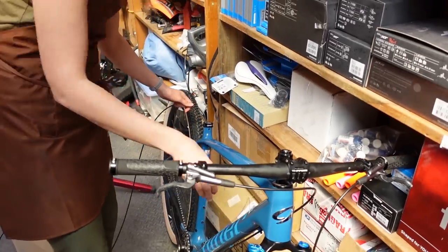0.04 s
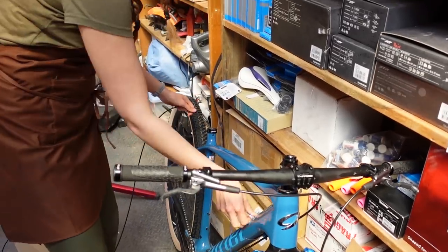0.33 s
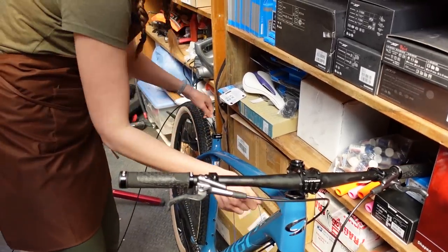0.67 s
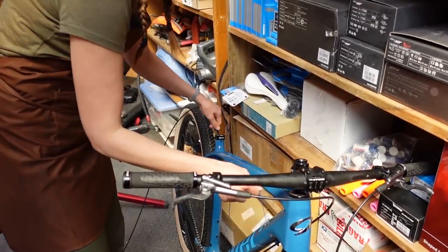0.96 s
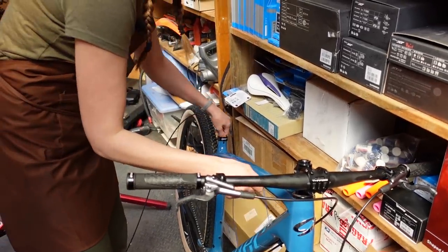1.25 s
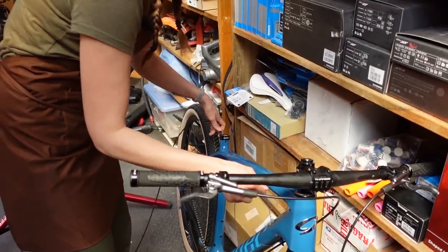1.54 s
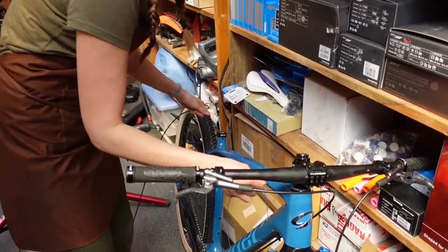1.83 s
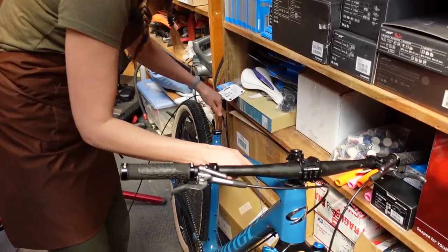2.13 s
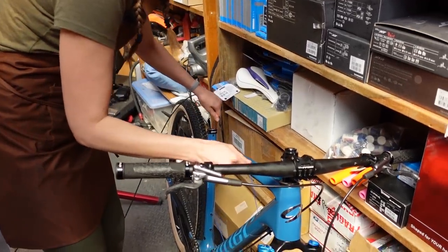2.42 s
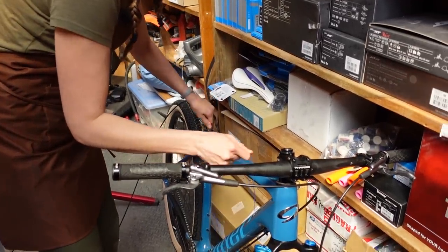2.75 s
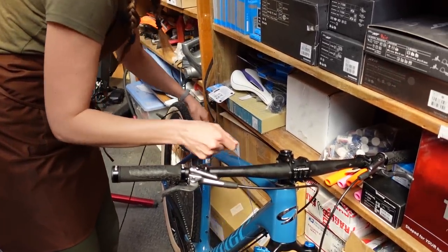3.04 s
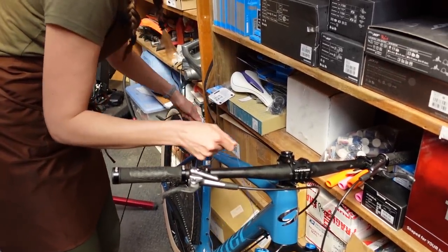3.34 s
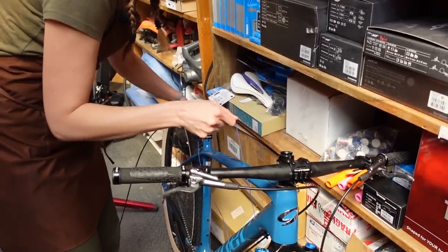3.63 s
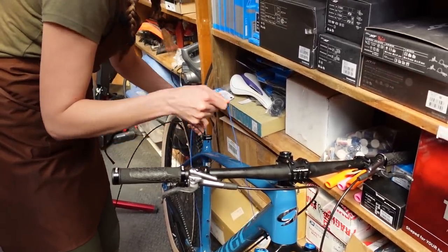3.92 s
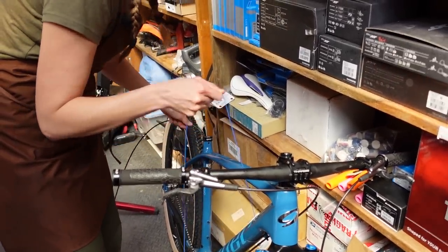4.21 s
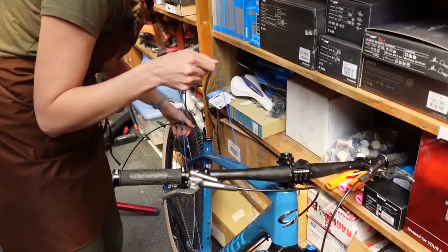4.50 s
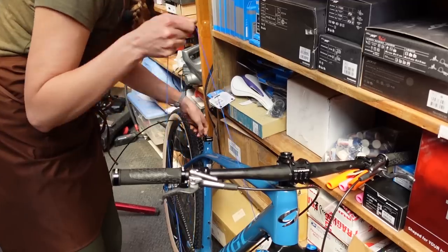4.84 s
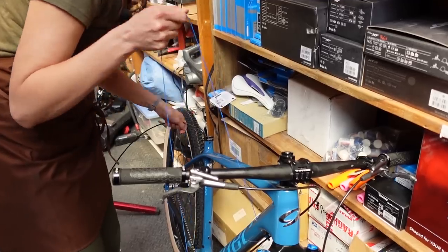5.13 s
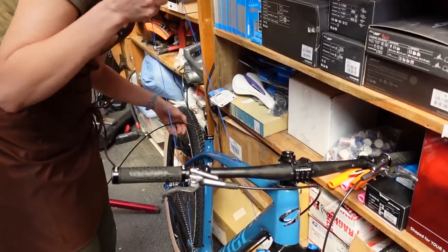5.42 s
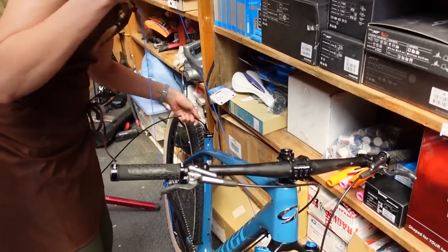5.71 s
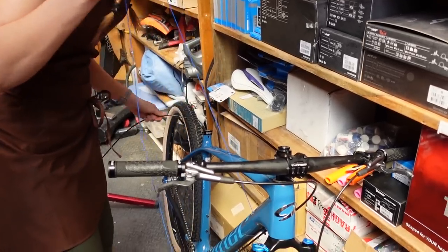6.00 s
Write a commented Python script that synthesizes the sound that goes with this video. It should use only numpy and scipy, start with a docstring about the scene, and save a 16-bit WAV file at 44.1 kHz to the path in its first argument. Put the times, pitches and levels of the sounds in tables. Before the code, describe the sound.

A cable housing is threaded through a bicycle frame, heard close up in a small, crowded workshop with little echo. In the first quarter second its loose end clatters against the hollow tubes in a quick cluster of clicks and slaps, each ringing briefly. Lighter taps and soft scrapes continue, with one sharp click at about 0.9 seconds. From 1.2 to 2.7 seconds it is quieter, with scattered ticks and the grainy rustle of hands and cloth. A few taps and a brief scrape come near 2.9 seconds. Then the housing is drawn through in short, raspy strokes at about 3.5, 3.9, 4.3, 4.7, 5.2 and 5.7 seconds, a couple carrying a faint squeak. Soft thumps fall among these pulls as the hands grip again and bump the frame. The strokes stay softer than the opening knocks, and a quiet room hum runs throughout.

```python
"""Threading brake housing through a bicycle frame

Close up in a small, crowded workshop, on a pair of microphones. The housing's loose end slaps and
clicks against the ringing tubes; then it is drawn through the port in short scraping strokes, with
soft thumps as the hands take a new grip. Sleeves rustle over a quiet room hum."""
import sys
import numpy as np
from scipy import signal
from scipy.fft import rfft, irfft, next_fast_len
from scipy.io import wavfile
from scipy.ndimage import uniform_filter1d, map_coordinates

SR = 44100
rng = np.random.default_rng(int(sys.argv[2]) if len(sys.argv) > 2 else 0)


def int16_out(signal):
    """Quantize to a 16-bit WAV file."""
    q = np.round(np.clip(np.atleast_2d(signal).T, -1, 1) * 32767)
    wavfile.write(sys.argv[1], SR, q.astype(np.int16))


N = 267235


def amp(db):
    """Decibels to gain."""
    return 10 ** (np.asarray(db) / 20)


def unit(x):
    """Scale to rms 1."""
    return x / np.sqrt(np.mean(x ** 2) + 1e-20)


def along(points, hz):
    """Read (frequency [Hz], value) points on a log frequency axis."""
    freqs, values = np.transpose(points)
    return np.interp(np.log(hz + 1), np.log(freqs + 1), values)


def wobble(rate):
    """A smooth random curve, rate knots a second."""
    knots = rng.standard_normal(int(N * rate / SR) + 4)
    return map_coordinates(knots, [np.arange(N) * rate / SR])


def filtered(x, response):
    """Pass x through a complex response of frequency."""
    size = next_fast_len(N + SR // 2)
    return irfft(rfft(x, size) * response(np.fft.rfftfreq(size, 1 / SR)), size)[..., :N]


def coloured(x, colour):
    """Give x a (frequency [Hz], level [dB]) colour, at rms 1."""
    return unit(filtered(x, lambda hz: amp(along(colour, hz))))


def resonance(hz, centre_hz, width_hz):
    """One damped mode, gain 1 at its centre."""
    return 1j * hz * width_hz / (centre_hz ** 2 - hz ** 2 + 1j * hz * width_hz)


def tight_pulse(colour_db, size=4096):
    """The minimum-phase pulse whose level follows this function of frequency."""
    cepstrum = irfft(np.log(amp(colour_db(np.fft.rfftfreq(size, 1 / SR)))))
    cepstrum[1:size // 2] *= 2
    cepstrum[size // 2 + 1:] = 0
    return irfft(np.exp(rfft(cepstrum)))


def burst(t60, size=8192):
    """Dying noise of energy 1, even in colour over wide bands."""
    decay = amp(-60 * np.arange(size) / SR / max(t60, 0.002))
    spectrum = rfft(rng.standard_normal(size) * decay)
    band_power = np.abs(uniform_filter1d(np.abs(spectrum) ** 2, size=70))
    even = irfft(spectrum / np.sqrt(band_power + 1e-12))[:size // 2]
    return even / np.linalg.norm(even)


def microphones(mid, scattered, side_colour):
    """Two close microphones agree in the middle range; scattered sound parts them in the treble."""
    side = filtered(scattered, lambda hz: amp(along(side_colour, hz)))
    return np.array([mid + side, mid - side])


def room_tone(air_db, waver_rad):
    """Soft moving air and a slightly unsteady hum, all round the microphones."""
    # colour of the air: (frequency [Hz], level [dB])
    air_colour = [(12, -40), (20, -0.5), (60, -6.5), (113, -7), (172, -3.5), (262, -6), (357, 2),
                  (446, -4.5), (738, -1), (873, -5.5), (1090, -2), (1960, -11.5), (4940, -13), (14700, -19),
                  (16000, -24.5)]
    # its stereo width: (frequency [Hz], side over mid [dB])
    air_side = [(60, -4), (150, -5.5), (380, -6.5), (950, -10), (2380, -3.5), (5980, -2.5), (15000, 1)]
    # tones of the hum: (frequency [Hz], level [dB])
    hum_tones = [(59, -77), (172.3, -79.5), (387.6, -105)]
    t = np.arange(N) / SR
    hum = sum(np.sqrt(2) * amp(db) * np.sin(2 * np.pi * hz * t + waver_rad * wobble(2.94))
              for hz, db in hum_tones)
    air, scattered = amp(air_db) * coloured(rng.standard_normal((2, N)), air_colour)
    return microphones(air, scattered, air_side) + hum


def movement(start, length, db, crest=0.37):
    """Gain of one hand movement: a quick start, a swell to its fastest moment, a stop."""
    attack_s, release_s = 0.027, 0.043
    edge_db, rest_db = -6.5, -23.5
    fastest = start + np.clip(crest, 0.02, 0.98) * length
    end = start + length
    times = [start - attack_s, start, fastest, end, end + release_s]
    t = np.arange(N) / SR
    moving = (t > times[0]) & (t < times[-1])
    return moving * amp(db + np.interp(t, times, [rest_db, edge_db, 0, edge_db, rest_db]))


def sleeve_rubs(grain_db):
    """Hands and cloth slide along the housing and frame with a grainy rustle."""
    # hand movements: (start [s], length [s], level [dB])
    rubs = [(0, 0.043, -50.5), (0.294, 0.58, -54.5), (0.986, 0.32, -58.5), (1.504, 0.28, -61),
            (1.855, 0.27, -54), (2.148, 0.45, -47.5), (2.804, .2, -61.5), (3.17, 0.11, -57),
            (3.389, 0.36, -52.5), (3.888, .16, -50), (4.248, 0.26, -54), (4.702, 0.034, -58),
            (4.94, 0.02, -46), (5.15, 0.37, -60.5), (5.6, 0.6, -59)]
    # colour of the rustle: (frequency [Hz], level [dB])
    rub_colour = [(70, -12), (160, -13), (250, -4.5), (350, 1.5), (650, 2.5), (1200, 0.5), (2000, -7.5),
                  (5000, -8.5), (14000, -23.5)]
    friction = rng.standard_normal(N) * amp(grain_db * wobble(120))
    return coloured(friction, rub_colour) * sum(movement(*rub) for rub in rubs)


def shifting_resonances(x, depth_db):
    """The free length of housing keeps changing, so its resonances come and go."""
    spectra = signal.stft(x, nperseg=1024)[2]
    patches = uniform_filter1d(rng.standard_normal(spectra.shape), size=4, axis=0)
    patches = unit(uniform_filter1d(patches, size=5, axis=1))
    return signal.istft(spectra * amp(depth_db * patches), nperseg=1024)[1][:N]


def port_scrapes(grain_db, judder_db):
    """The housing's sheath catches and slips on the port's edge with each pull."""
    # pulls through the port: (start [s], length [s], level [dB],
    # fastest moment [share of length], treble lift [dB], rasp lift [dB])
    pulls = [(.01, 0.19, -50.5, 0.8, -5, 6), (0.136, 0.32, -47, 0.4, 4, 1), (0.54, 0.26, -48, .6, 6, 6),
             (0.873, 0.29, -52.5, 0.12, 13.5, 7.5), (1.199, 0.15, -53.5, 1, 0, 0),
             (1.485, 0.09, -58, 0.54, 3.5, -3), (1.832, 0.017, -57, .4, 3, -2),
             (1.911, 0.21, -54, 0.55, 7, -2), (2.258, 0.079, -50, 0.24, 2.5, -14),
             (2.433, 0.11, -46, 0.57, -0.5, 0), (2.783, .04, -50, .5, 13.5, -12),
             (2.905, 0.079, -38, 0.87, 4.5, -7), (3.465, 0.12, -39.5, 0.51, 11.5, 1),
             (3.615, 0.084, -56.5, 0.27, 9, -1), (3.88, .16, -40.5, .45, 0.5, 1),
             (4.276, 0.16, -38.5, 0.38, 3, 1.5), (4.728, 0.17, -39, 0.38, 1.5, 4),
             (5.188, .15, -37.5, 0.48, 3, 3), (5.655, 0.13, -43.5, 0.36, 5, 2),
             (5.835, 0.07, -51.5, 0.23, 3, -3)]
    # colour of the scrape: (frequency [Hz], level [dB])
    scrape_colour = [(240, -45), (400, -38), (742, -10.5), (893, -13.5), (1180, 4), (1290, -6), (1710, 2),
                     (1790, -5), (2120, -1.5), (3930, -3), (5600, -5.5), (6050, -5), (11800, -20),
                     (16000, -33.5)]
    # the port's rasping resonance: (centre [Hz], width [Hz])
    rasp_mode = (3830, 720)
    slips = rng.standard_normal(N) * amp(grain_db * wobble(930) + judder_db * wobble(70))
    scrape = coloured(shifting_resonances(slips, depth_db=3.0), scrape_colour)
    hiss = filtered(scrape, lambda hz: hz ** 2 / (hz ** 2 + 5500 ** 2))
    rasp = filtered(scrape, lambda hz: resonance(hz, *rasp_mode))
    out = np.zeros(N)
    for start, length, db, crest, treble_db, rasp_db in pulls:
        stroke = scrape + hiss * (amp(treble_db) - 1) + rasp * (amp(rasp_db) - 1)
        out += movement(start, length, db, crest) * stroke
    return out


def contacts(strikes, colour, snap_db, pitch_spread, chatter_s, rise_s):
    """Each contact is a snap and a brief chatter; the spot that is struck favours its own pitch."""
    out = np.zeros(N + SR)
    for start, db, tilt_db, t60, pitch_hz, emphasis_db in strikes:
        favoured = lambda hz: emphasis_db * np.exp(-(np.log((hz + 1) / pitch_hz) / pitch_spread) ** 2)
        hardness = lambda hz: tilt_db * np.log2(np.hypot(hz, 300) / pitch_hz)
        pulse = tight_pulse(lambda hz: along(colour, hz) + hardness(hz) + favoured(hz))
        # short contacts are nearly all snap; long ones are scuffs that build up more slowly
        softness = min(t60 / chatter_s, 3) ** 2
        force = burst(t60)
        force *= 1 - np.exp(-np.arange(len(force)) / SR / (rise_s * softness))
        force[0] += amp(snap_db) / softness
        hit = signal.fftconvolve(force, pulse)
        hit *= np.sqrt(SR / 100) / np.linalg.norm(hit)  # the energy of 10 ms at rms 1
        out[round(start * SR):][:len(hit)] += amp(db) * hit
    return out[:N]


def end_clicks():
    """The hard end of the housing clicks on the frame."""
    # clicks: (time [s], level [dB], tilt [dB/octave], chatter t60 [s], pitch [Hz], emphasis [dB])
    strikes = [(0.109, -21, 11, 0.037, 6300, -0.5), (0.1119, -27.5, -1.5, 0.024, 6260, 3),
               (0.147, -30, 7, 0.033, 4360, 7), (0.153, -27, 0, 0.027, 3380, 8),
               (0.329, -38, 4, .068, 1260, 10), (0.3702, -29.5, -4.5, 0.02, 3020, 11),
               (0.443, -52, 8, 0.021, 1170, 5), (0.534, -33, 4.5, 0.11, 1080, 23),
               (0.623, -36.5, 2, .057, 4370, 1), (0.667, -30, 0, 0.069, 4970, 2.5),
               (0.713, -37.5, 0, 0.05, 4430, 10), (0.753, -44, -2.5, 0.037, 1260, 7),
               (0.9328, -17.5, -.5, 0.049, 4540, 6.5), (1.094, -37.5, 0, 0.035, 3820, 9),
               (1.126, -42.5, 1.5, 0.046, 3700, 1), (1.1807, -27.5, -4, 0.036, 3340, 5.5),
               (1.562, -31, -5.5, 0.059, 1335, 4.5), (2.3095, -34, -2.5, 0.036, 3000, 3.5),
               (2.455, -47, 8, 0.032, 4500, 9), (2.562, -39.5, 0, 0.032, 1160, 14),
               (2.765, -32, -3.5, 0.17, 1190, 10.5), (2.793, -39, -7.5, 0.049, 684, 11),
               (2.939, -29.5, -0.5, 0.11, 714, 12), (2.956, -33, -0.5, 0.026, 1090, 6),
               (3.167, -39, -5, 0.06, 1430, 4), (3.671, -37, -4.5, 0.046, 5200, 4),
               (3.729, -51.5, 15, .03, 8060, 2), (4.009, -29.5, -4, 0.083, 2430, -2),
               (5.171, -37.5, -1, 0.18, 4020, 3)]
    # colour of a hard tap: (frequency [Hz], level [dB])
    colour = [(70, -37), (300, -21), (1100, -2), (2800, 2), (5600, 3), (11300, -12), (16000, -33)]
    return contacts(strikes, colour, snap_db=-3, pitch_spread=0.15, chatter_s=0.018, rise_s=0.00021)


def tube_slaps():
    """The loose length of housing slaps the hollow tubes."""
    # slaps: (time [s], level [dB], tilt [dB/octave], chatter t60 [s], pitch [Hz], emphasis [dB])
    strikes = [(0.1343, -17.5, -4.5, 0.014, 1020, 7.7), (0.217, -19.5, 6, 0.046, 2420, 8.9),
               (0.2204, -13.5, 1, 0.048, 1340, 9.3), (0.2307, -20.5, 4, 0.068, 1320, 3.4),
               (0.3698, -27.5, 2.5, 0.025, 1200, 8), (0.482, -38.5, -1.5, 0.08, 1280, 5.9),
               (0.513, -44, 1, 0.033, 1350, 10), (0.5667, -29.5, 4, 0.022, 1200, 11),
               (0.79, -46.5, -3, 0.071, 1210, 9.4), (0.933, -34.5, -1, 0.024, 667, 36),
               (1.935, -47, 1.5, .08, 1330, 7.3), (2.358, -39.5, 1.5, 0.054, 1430, 14),
               (3.461, -36, 2, 0.067, 1560, 9.1), (4.549, -43.5, 1, 0.04, 840, 15),
               (4.924, -34, 1.5, 0.081, 2370, 7.6)]
    # colour of a hollow knock: (frequency [Hz], level [dB])
    colour = [(70, -40.5), (300, -16), (1100, 4.5), (2800, -6.5), (5600, -12), (11300, -27), (16000, -46)]
    return contacts(strikes, colour, snap_db=-4, pitch_spread=0.32, chatter_s=0.022, rise_s=0.00013)


def hand_bumps():
    """The hands bump the frame as they take a new grip."""
    # bumps: (time [s], level [dB], tilt [dB/octave], chatter t60 [s], pitch [Hz], emphasis [dB])
    strikes = [(1.84, -51.5, -1, 0.069, 202, 21), (3.753, -45, -9, 0.084, 248, 3),
               (4.143, -39.5, -6.5, 0.04, 210, 3), (4.168, -49, -8, 0.072, 600, 5.5),
               (4.686, -42.5, -0.5, 0.059, 1100, 1), (4.808, -39.5, 1.5, 0.073, 800, 3.4),
               (5.109, -35.5, 2.5, 0.067, 323, 5), (5.133, -45, 0.5, .05, 700, 6),
               (5.24, -34.5, 2, 0.064, 704, 1.8), (5.45, -51, 0.5, 0.052, 500, 13),
               (5.54, -47.5, -0.5, 0.071, 595, 2), (5.716, -40.5, 1.5, 0.13, 326, 5.3),
               (5.857, -43.5, 4.5, 0.077, 450, 14), (5.912, -45.5, 2, 0.07, 1050, 2.9)]
    # colour of a soft thump: (frequency [Hz], level [dB])
    colour = [(70, -21.5), (300, 3), (1100, 3.5), (2800, -6), (5600, -29.5), (11300, -46), (16000, -45)]
    return contacts(strikes, colour, snap_db=0, pitch_spread=0.16, chatter_s=0.024, rise_s=0.00029)


def squeaks(jitter, overtone_db):
    """The slips lock into nearly regular stick-slip: a wavering pitch with weaker overtones."""
    # faint squeaks: (centre [s], half length [s], start pitch [Hz], end pitch [Hz], level [dB])
    glides = [(3.467, 0.021, 1570, 1573, -44.5), (3.53, 0.026, 1697, 1697, -40.5),
              (3.604, 0.0038, 3290, 3470, -38.5), (5.204, 0.01, 1407, 1510, -41.5),
              (5.295, 0.021, 3570, 4110, -45)]
    t = np.arange(SR // 5) / SR - 0.1
    out = np.zeros(N)
    for centre, half, start_hz, end_hz, db in glides:
        waver = unit(uniform_filter1d(rng.standard_normal(len(t)), size=60))
        hz = np.interp(t, [-half, half], [start_hz, end_hz]) * (1 + jitter * waver)
        phase = 2 * np.pi * np.cumsum(hz) / SR
        tone = sum(amp(k * overtone_db) * np.sin((k + 1) * phase) for k in range(4))
        swell = np.exp(-(t / half) ** 2)
        out[round((centre + t[0]) * SR):][:len(t)] += amp(db) * unit(tone) * swell
    return out


def frame_ring(x, ring_db):
    """The tubes add their narrow resonances to whatever touches them."""
    # modes of the frame and its fittings: (centre [Hz], width [Hz], relative level [dB])
    modes = [(325, 27, -3), (383, 18, -9), (490, 14, -0.5), (616, 33, 4), (693, 8.9, 10), (768, 9.5, 10),
             (966, 14, 3), (1090, 30, -3), (1164, 35, 1), (1227, 20, 0.5), (1376, 4.1, 7.5), (1429, 14, 6),
             (1550, 5.3, -10), (1510, 4.9, -16), (1860, 7.5, -9), (1910, 5.5, -5.5), (2440, 19, 1.5),
             (2990, 4.8, -15), (3160, 69, -1.5), (3390, 26, -3), (3562, 12, -17), (3985, 100, 0),
             (4830, 30, -3), (6480, 10, -18), (7710, 26, 10)]
    response = lambda hz: sum(amp(db) * resonance(hz, centre, width) for centre, width, db in modes)
    return x + amp(ring_db) * filtered(x, response)


def room_tail(onset_s):
    """Shelves and boxes close by answer at once; the treble dies first."""
    # the workshop's decay: (frequency [Hz], t60 [s])
    decay_times = [(200, 0.49), (650, 0.31), (1200, 0.25), (2000, 0.26), (3700, 0.21), (9700, 0.14),
                   (15000, 0.082)]
    hz, t, spectra = signal.stft(rng.standard_normal(SR // 2), SR, nperseg=256)
    decay = amp(-60 * t / along(decay_times, hz)[:, None])
    tail = signal.istft(spectra * decay, SR, nperseg=256)[1]
    tail *= 1 - np.exp(-(np.arange(len(tail)) / SR / onset_s) ** 2)
    return tail / np.linalg.norm(tail)


def workshop_echoes(x, wet_db, onset_s, spots=12):
    """The sounding spot moves along the frame, and the pattern of echoes changes with it."""
    place = np.linspace(0, spots - 1, N)
    shares = [np.sqrt(np.maximum(1 - np.abs(place - k), 0)) for k in range(spots)]
    echoes = sum(signal.oaconvolve(x * share, room_tail(onset_s))[:N] for share in shares)
    return x + amp(wet_db) * echoes


def scene():
    """Contacts and strokes sound through the frame, near the microphones, with the room behind."""
    # stereo width at the bicycle: (frequency [Hz], side gain [dB])
    near_side = [(100, -27), (500, -17), (1000, -27), (2000, -13.5), (4000, -8), (8000, -4), (13000, -1.5)]
    hits = end_clicks() + tube_slaps() + hand_bumps()
    strokes = port_scrapes(grain_db=-0.5, judder_db=2.0) + sleeve_rubs(grain_db=2.8)
    strokes += squeaks(jitter=0.025, overtone_db=-7.5)
    bicycle = frame_ring(hits + strokes, ring_db=-6.0)
    mid = workshop_echoes(bicycle, wet_db=-9.0, onset_s=0.0051)
    # reflections from the walls and from nearby boxes reach the two microphones differently
    walls = amp(-5.5) * signal.oaconvolve(bicycle, room_tail(onset_s=0.00047))[:N]
    boxes = amp(-5) * signal.oaconvolve(bicycle, burst(t60=0.021))[:N]
    return microphones(mid, walls + boxes, near_side) + room_tone(air_db=-58.5, waver_rad=0.68)


def record(dry):
    """Both microphone channels cut off steeply at the top of the treble."""
    top_hz = 16200
    return filtered(dry, lambda hz: 1 / (1 + (hz / top_hz) ** 160))


dry = scene()
out = record(dry)
int16_out(out)
```